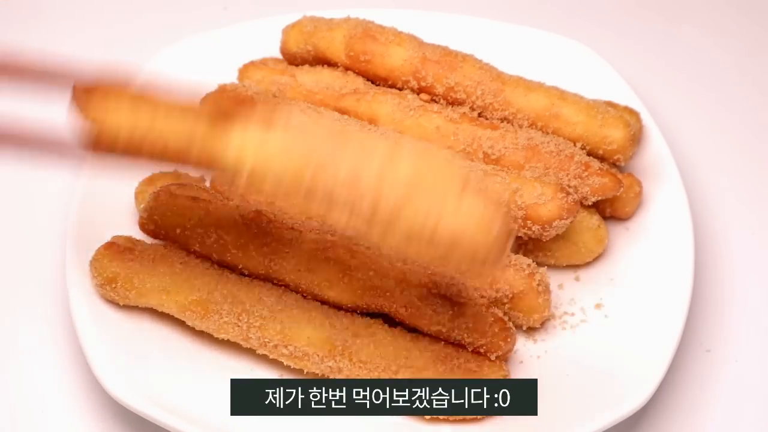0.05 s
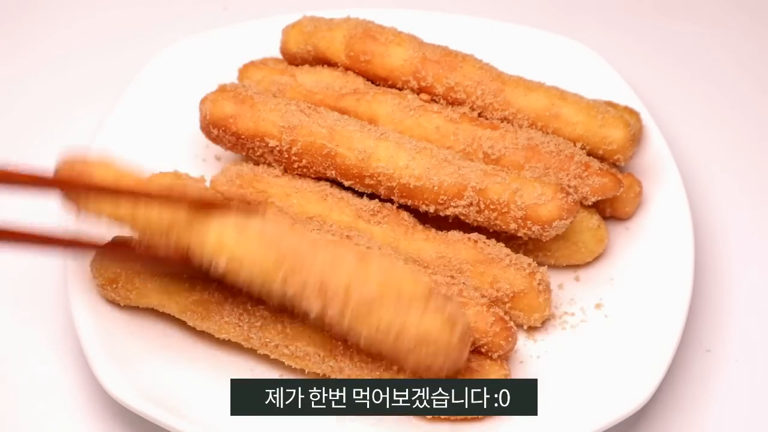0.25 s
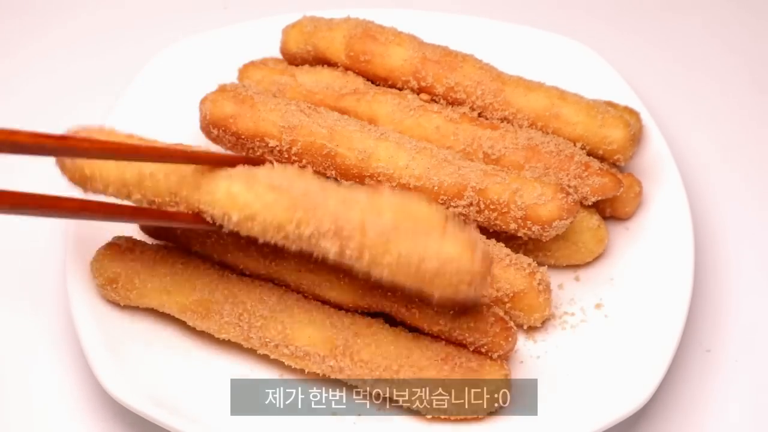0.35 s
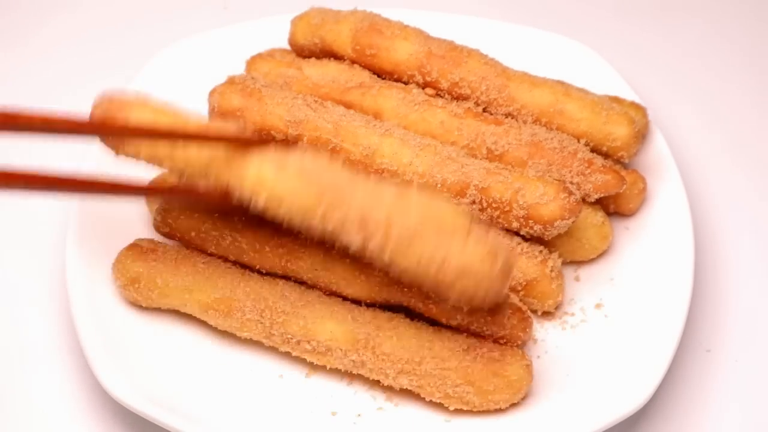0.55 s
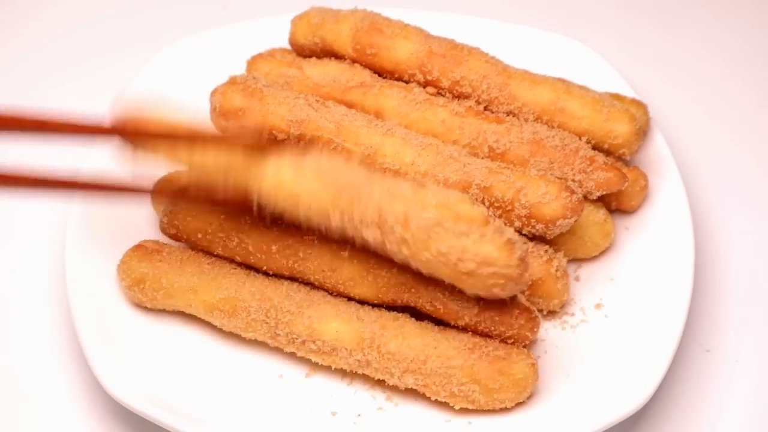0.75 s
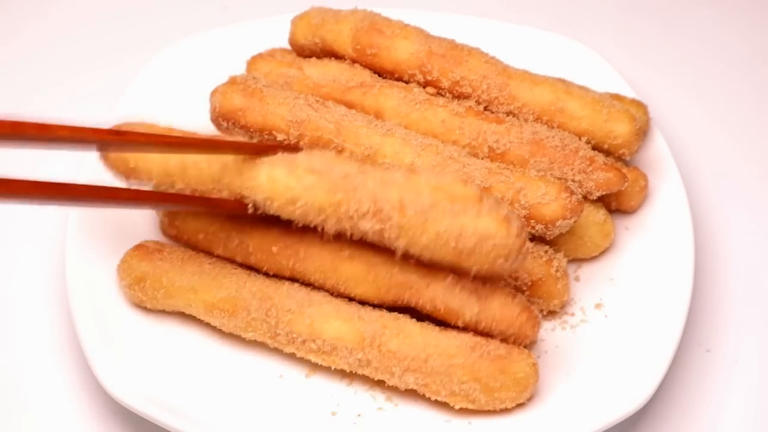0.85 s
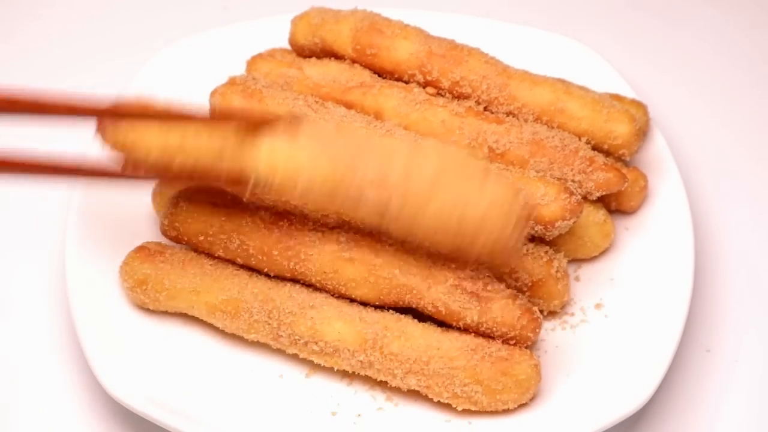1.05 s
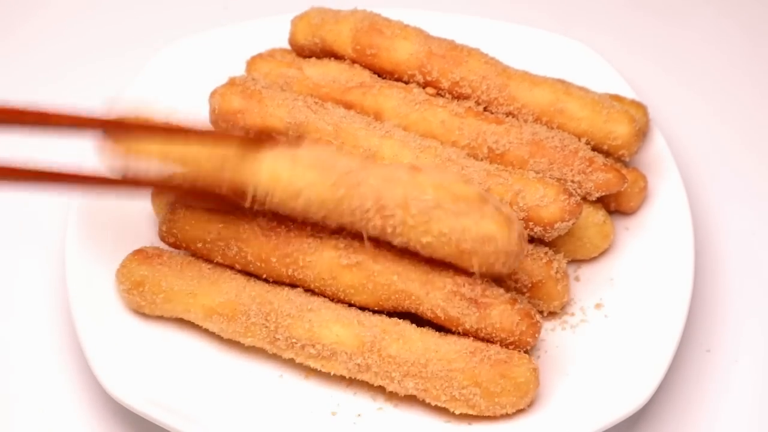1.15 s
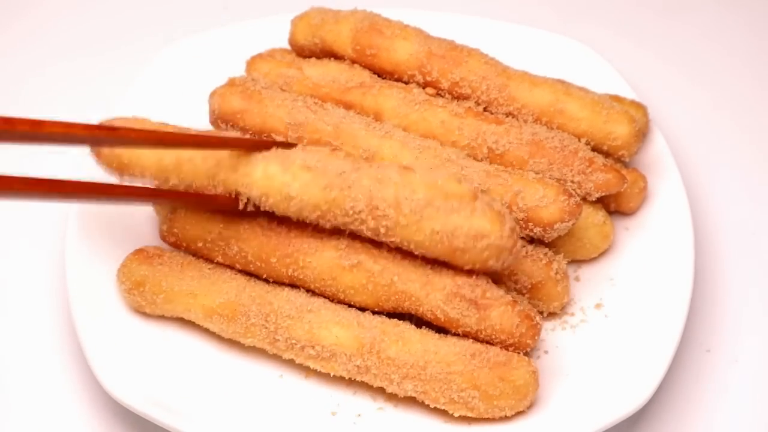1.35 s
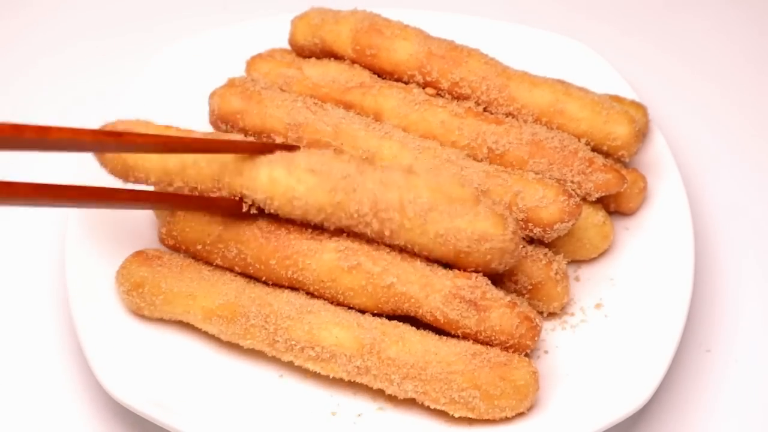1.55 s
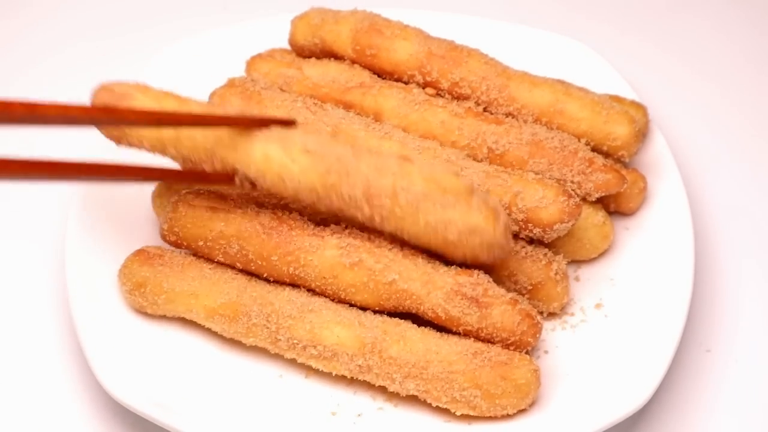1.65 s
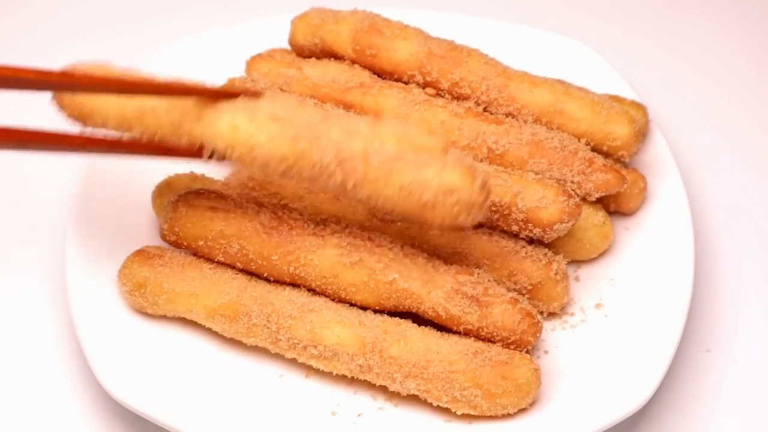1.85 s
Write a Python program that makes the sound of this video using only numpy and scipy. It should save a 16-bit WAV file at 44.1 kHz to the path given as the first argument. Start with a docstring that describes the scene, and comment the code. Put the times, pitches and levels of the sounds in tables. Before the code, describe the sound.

A sugar-coated churro held in chopsticks taps a pile of others on a plate about seven times. Each close tap has a dry crack, a soft thump and a gritty sugar crunch, over faint hiss in a small kitchen.

```python
"""Steady hiss and mains hum, then seven close, crunchy taps: a sugar-coated churro, held in chopsticks,
strikes a pile of others on a plate. Brittle fracture of the crust gives each tap its crack, and the
blow passes through the soft dough to excite low, damped modes of plate and table. Friction grinds
sugar grains as the churro settles and lifts. A small kitchen adds faint reverberation."""
import sys
import numpy as np
from scipy import signal
from scipy.fft import rfft, irfft, next_fast_len
from scipy.io import wavfile
from scipy.ndimage import map_coordinates

SR = 44100
rng = np.random.default_rng(int(sys.argv[2]) if len(sys.argv) > 2 else 0)


def put_to_file(sound):
    """Save the sound as 16-bit audio at rate SR, in the file named by the first command-line argument."""
    columns = np.atleast_2d(sound).T  # one column per channel
    safe = np.clip(columns, -1, 1)
    whole_steps = np.round(safe * 32767)
    wavfile.write(sys.argv[1], SR, whole_steps.astype(np.int16))


N = 83790


def amp(db):
    """Amplitude ratio of a level in decibels."""
    return 10 ** (np.asarray(db) / 20)


def unit_rms(x):
    """Normalisation to an rms of 1."""
    return x / np.sqrt(np.mean(x ** 2) + 1e-20)


def curve_at(points, hz):
    """Interpolation of (frequency, value) points on a logarithmic frequency axis."""
    frequencies, values = np.transpose(points)
    return np.interp(np.log(hz + 1), np.log(frequencies + 1), values)


def since(start_s):
    """Seconds elapsed since an onset, zero before it."""
    return np.maximum(np.arange(N) / SR - start_s, 0)


def filtered(x, response):
    """Linear filtering: the spectrum is multiplied by a frequency response."""
    size = next_fast_len(N + SR // 4)
    return irfft(rfft(x, size) * response(np.fft.rfftfreq(size, 1 / SR)), size)[..., :N]


# Spectrum of the hiss: frequency_hz, relative_density_db
HISS_SPECTRUM = [(53, -64), (90, -6), (187, 1.5), (504, -3), (550, -4.5), (712, -2), (1330, -4.5),
                 (1480, -8), (2280, -8.5), (2540, -9.5), (4350, -9), (6410, -10.5), (15500, -12)]
# Likeness of the hiss in left and right: frequency_hz, correlation
HISS_CORRELATION = [(80, 0.45), (200, 0.46), (550, 0.084), (1650, 0.3), (5000, 0.11), (15000, 0.059)]

def hiss(level_db=-50.5):
    """Partly coherent noise: the balance of mid and side power sets the left-right correlation."""
    def response(hz):
        angle = np.arccos(curve_at(HISS_CORRELATION, hz)) / 2
        high_pass = hz / np.hypot(hz, 70)
        return amp(curve_at(HISS_SPECTRUM, hz)) * high_pass * [np.cos(angle), np.sin(angle)]
    mid, side = filtered(rng.standard_normal((2, N)), response)
    return amp(level_db) * unit_rms(np.array([mid + side, mid - side]))


def mains_hum(level_db=-59, pitch_hz=60):
    """A pure tone at the mains frequency."""
    return amp(level_db) * np.sqrt(2) * np.sin(2 * np.pi * pitch_hz * since(0))


# Reverberation time of the kitchen: frequency_hz, t60_s
KITCHEN_DECAY = [(100, 0.47), (240, 0.52), (450, 0.3), (1000, 0.31), (4000, 0.11), (14000, 0.45)]
# Stereo width of the reflections: frequency_hz, side_over_mid_db
REFLECTION_WIDTH = [(100, -40), (300, -20), (700, -14), (1200, -20), (2300, -25), (4500, -24),
                    (10000, -5.5)]

def reverberation(x, decay=KITCHEN_DECAY):
    """Dense reflections act as convolution with noise that decays exponentially in each band."""
    hz, t, bands = signal.stft(rng.standard_normal((2, SR // 2)), SR, nperseg=256)
    bands = bands * amp(-60 * t / curve_at(decay, hz)[:, None])
    bands[1] *= amp(curve_at(REFLECTION_WIDTH, hz))[:, None]
    mid, side = signal.istft(bands, SR, nperseg=256)[1]
    tail = np.array([mid + side, mid - side])
    return signal.fftconvolve(x[None], tail / np.linalg.norm(tail[0]), axes=1)[:, :N]


# Resonances of crust and chopsticks: pitch_hz, bandwidth_hz, gain_db
CRUST_RESONANCES = [(1193, 200, 1), (1440, 110, 1), (1773, 250, -2.5), (2176, 280, 4), (2530, 130, -0.5),
                    (3413, 130, 6.5), (3724, 260, 3.5), (4320, 370, -3), (5580, 200, 5.5), (6000, 450, 1.5),
                    (7050, 160, 3), (7880, 630, -2), (11400, 1600, 6.5)]

def crust_resonance(x, spectrum, treble_db, spot=(), shelf_hz=6230, size=2048):
    """Forced resonance: crust and chopsticks colour an excitation as a minimum-phase filter."""
    hz = np.fft.rfftfreq(size, 1 / SR)
    peaks_db = sum(gain_db / (1 + (2 * (hz - pitch_hz) / bandwidth_hz) ** 2)
                   for pitch_hz, bandwidth_hz, gain_db in [*CRUST_RESONANCES, *spot])
    shelf_db = treble_db * np.tanh(2 * np.log((hz + 1) / shelf_hz)) / 2
    gain = unit_rms(amp(curve_at(spectrum, hz) + peaks_db + shelf_db))
    # Folding the cepstrum makes the ringing follow its cause.
    cepstrum = irfft(np.log(gain))
    cepstrum[1:size // 2] *= 2
    cepstrum[size // 2 + 1:] = 0
    impulse_response = irfft(np.exp(rfft(cepstrum)))
    return signal.fftconvolve(x, impulse_response)[:N]


def sugar_grains(grains_per_s=2800, spread_db=5, powder_gain=0.5):
    """Shot noise: crystals fracture as random impulses over the smooth noise of fine powder."""
    sizes = amp(spread_db * np.clip(rng.standard_normal(N), -2, 2)) * rng.choice([-1, 1], N)
    fractures = unit_rms(sizes * (rng.random(N) < grains_per_s / SR))
    return unit_rms(fractures + powder_gain * rng.standard_normal(N))


def clustering(clusters_per_s=250, depth_db=1):
    """Random amplitude modulation: a smooth gain curve for grains breaking in small clusters."""
    position = np.arange(N) * clusters_per_s / SR
    return amp(depth_db * map_coordinates(rng.standard_normal(N), [position]))


# Sugar ground between the crusts: start_s, level_db, rise_s, t60_s, treble_db
GRINDS = [(0.179, -52, 0.01, 0.75, -40), (.262, -44.5, 0.006, 0.21, -3), (.345, -52, 0.011, 0.12, 0),
          (0.478, -35.5, 0.015, 0.25, -3.5), (0.568, -43, 0.011, 0.17, -12), (0.727, -37, 0.004, 0.24, -2),
          (0.784, -49.5, .02, 0.22, -10), (0.954, -42.5, 0.0026, 0.26, -6), (0.994, -46.5, .015, 0.14, 1),
          (1.181, -39, 0.0031, 0.16, 2), (1.207, -41.5, 0.0054, 0.27, -26), (1.385, -43, 0.0021, 0.35, -6),
          (1.597, -45.5, 0.0041, 0.26, -11), (1.640, -56, 0.006, 0.66, 14)]
# Spectrum of the grinding: frequency_hz, relative_density_db
GRIND_SPECTRUM = [(60, -15), (230, 7), (450, 2), (800, -3), (2000, -4.5), (4000, -2.5), (6500, -7.5),
                  (9000, -15.5), (15500, -24)]

def sugar_grinding():
    """Granular friction: sugar crunches as the churro settles, slides and lifts off."""
    out = np.zeros(N)
    for start_s, level_db, rise_s, t60_s, treble_db in GRINDS:
        attack = np.minimum(since(start_s) / rise_s, 1)
        envelope = attack * amp(level_db - 60 * since(start_s + rise_s) / t60_s)
        grit = unit_rms(sugar_grains() * clustering())
        out += crust_resonance(envelope * grit, GRIND_SPECTRUM, treble_db)
    return out


def damped_mode(t, pitch_hz, level_db, t60_s):
    """Free vibration of a damped oscillator: a sinusoid that falls 60 dB in t60_s."""
    return amp(level_db - 60 * t / t60_s) * np.sin(2 * np.pi * pitch_hz * t)


# Modes of the loaded plate: nominal_pitch_hz, relative_level_db, t60_s
PLATE_MODES = [(231.3, -13, 0.22), (273, -10.5, 0.085), (284, 4, 0.041), (350, 2, 0.056),
               (374, -3.5, 0.016), (520, 5.5, 0.035), (608, -3.5, 0.057), (785, -5, 0.038),
               (880, -20, 0.021), (1001, -8, 0.069), (1235, -13, 0.039)]
# Modes of the table top: pitch_hz, relative_level_db, t60_s
TABLE_MODES = [(90, -7, 0.18), (113, -15.5, 0.13), (158, -19, 0.25)]
# Landings of the dough: start_s, level_db, contact_cutoff_hz, plate_pitch_ratio, table_gain_db
LANDINGS = [(0.257, -29.5, 343, .98, -8.5), (0.4762, -36.5, 525, 0.94, 10.5), (0.7275, -21.5, 357, .98, -2),
            (.9490, -30, 593, 1.02, 0.5), (1.1773, -28.5, 623, .99, 5), (1.3825, -23, 880, 0.995, 2),
            (1.5935, -35, 770, 1.04, 9), (1.6374, -36, 420, 1.04, -9)]

def dough_thumps(plate_rise_s=0.0017, table_rise_s=0.0071):
    """Impact excites the modes of plate and table; a softer contact weakens the plate's upper modes."""
    out = np.zeros(N)
    for start_s, level_db, cutoff_hz, pitch_ratio, table_gain_db in LANDINGS:
        t = since(start_s)
        plate = sum(damped_mode(t, hz * pitch_ratio, db, t60_s) / np.hypot(1, (hz / cutoff_hz) ** 2)
                    for hz, db, t60_s in PLATE_MODES)
        plate *= 1 - np.exp(-t / plate_rise_s)
        table = sum(damped_mode(t, *mode) for mode in TABLE_MODES)
        table *= 1 - np.exp(-t / table_rise_s)
        out += amp(level_db) * (amp(table_gain_db) * table - plate)
    return out


# Crust fractures: start_s, level_db, t60_s, treble_db, spot_pitch_hz, spot_bandwidth_hz, spot_gain_db
CRACKS = [(0.2439, -31.5, 0.027, -8, 5360, 800, 6.5), (.2535, -35.5, 0.041, 0.5, 5600, 1200, 7.5),
          (0.311, -45, .006, 0, 3480, 600, 11), (0.4749, -36, 0.04, 2, 590, 151, 25.5),
          (0.489, -37.5, 0.036, 29, 3500, 600, 5), (0.7214, -29.5, 0.057, -1.5, 3400, 400, 8.5),
          (0.817, -48, 0.0072, -2, 3700, 600, 3), (0.9461, -32, 0.041, -4, 2200, 900, 4),
          (1.1768, -22.5, 0.013, 11.5, 7060, 700, 7), (1.1765, -33, 0.11, -8, 1350, 700, 8.5),
          (1.3813, -30.5, 0.059, -5, 780, 450, 7), (1.4635, -37.5, 0.014, 16, 6040, 1000, 2),
          (1.592, -40.5, 0.073, 0.5, 1460, 400, 9), (1.6367, -37.5, 0.027, -7, 6450, 900, 14.5)]
# Spectrum of the cracking: frequency_hz, relative_density_db
CRACK_SPECTRUM = [(60, -19), (400, -11), (1000, 0.5), (2000, -3), (4000, -2.5), (6500, -5.5), (9000, -13),
                  (15500, -16)]

def crust_cracks():
    """Brittle fracture: an abrupt broadband burst, coloured by the resonance of the spot struck."""
    out = np.zeros(N)
    for start_s, level_db, t60_s, treble_db, *spot in CRACKS:
        t = since(start_s)
        envelope = (t > 0) * amp(level_db - 60 * t / t60_s)
        fractures = unit_rms(sugar_grains() + rng.standard_normal(N))
        out += crust_resonance(envelope * fractures, CRACK_SPECTRUM, treble_db, [spot])
    return out


def scene():
    """Superposition of the centred taps, their reflections and the steady background."""
    crunch = crust_cracks() + sugar_grinding()
    thumps = dough_thumps()
    near_surfaces = amp(-15.5) * reverberation(crunch, decay=[(1000, 0.15)])  # 0.15 s in every band
    kitchen = reverberation(amp(-10) * crunch + amp(-11) * thumps)
    return hiss() + mains_hum() + kitchen + near_surfaces + thumps + crunch


def record(dry, low_cut_hz=30, band_limit_hz=15950):
    """Band limiting: a first-order high-pass in the deep bass and a sharp cut in the top treble."""
    return filtered(dry, lambda hz: (hz < band_limit_hz) * 1j * hz / (low_cut_hz + 1j * hz))


dry = scene()
out = record(dry)
put_to_file(out)
```